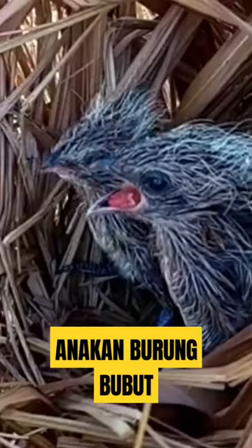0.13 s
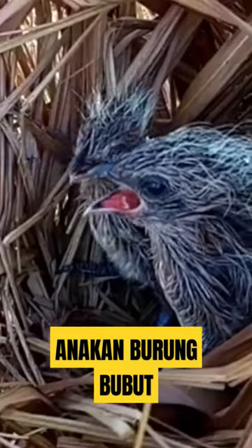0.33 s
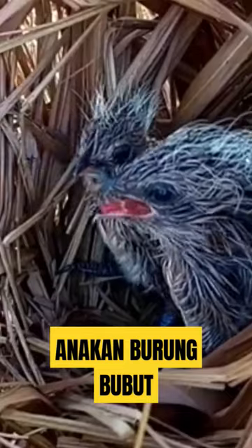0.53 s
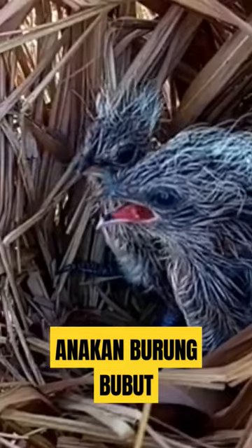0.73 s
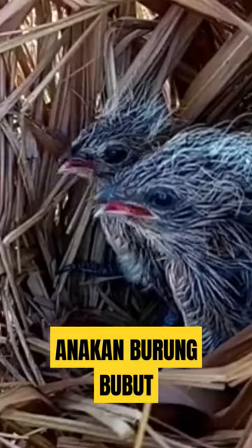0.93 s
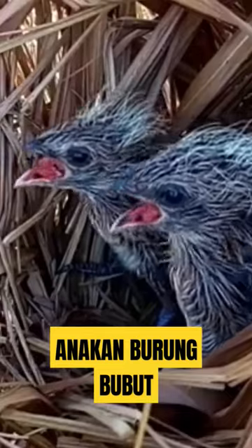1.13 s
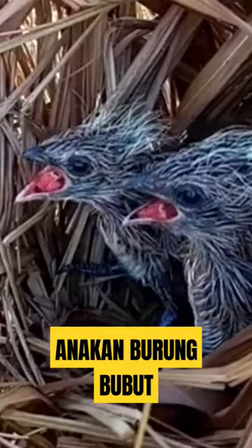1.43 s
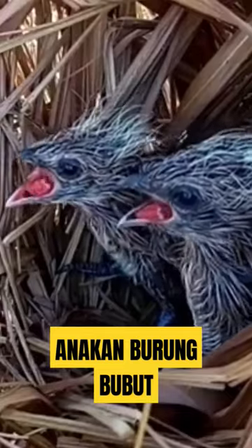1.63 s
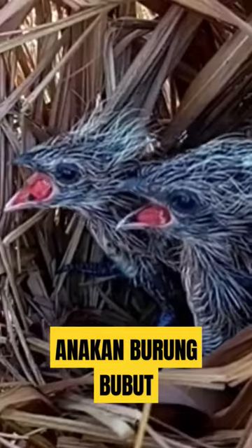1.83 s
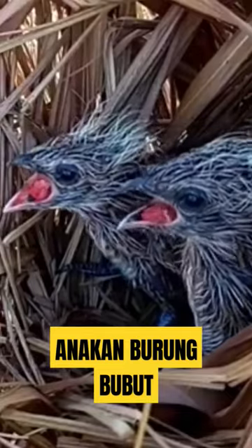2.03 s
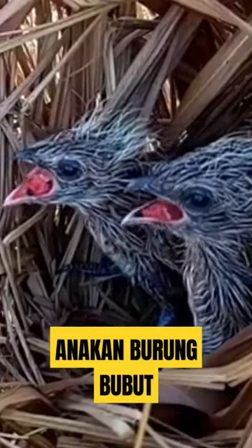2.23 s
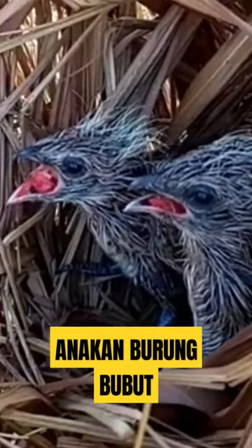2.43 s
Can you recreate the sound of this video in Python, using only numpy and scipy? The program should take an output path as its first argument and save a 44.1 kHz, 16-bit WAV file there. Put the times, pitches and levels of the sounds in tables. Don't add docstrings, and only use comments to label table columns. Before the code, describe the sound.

After a brief silence, harsh wheezy chick calls come irregularly, a sharp beak snap follows near one second, then steady rapid hissy squeaks continue over rumbling wind, soft outdoor hush and faint buzzing insects.

```python
import sys
import numpy as np
from scipy import signal
from scipy.fft import rfft, irfft
from scipy.io import wavfile
from scipy.ndimage import uniform_filter1d

SR = 44100
rng = np.random.default_rng(int(sys.argv[2]) if len(sys.argv) > 2 else 0)


def int16_out(signal):
    q = np.round(np.clip(np.atleast_2d(signal).T, -1, 1) * 32767)
    wavfile.write(sys.argv[1], SR, q.astype(np.int16))


def makeup_ratio(level_db):
    decades = np.asarray(level_db, float) / 20
    return 10 ** decades


N = 114219
T = np.arange(N) / SR
START_S = 0.1285
PORT_HZ, PORT_WIDTH_HZ, PORT_DB = 11195, 221, 20


def unit(x):
    return x / np.sqrt(np.mean(x ** 2))


def ring(x, hz, width_hz):
    return signal.lfilter(*signal.iirpeak(hz, hz / width_hz, SR), x)


def ring_twice(x, hz, width_hz):
    return ring(ring(x, hz, width_hz), hz, width_hz)


def walk(rate_hz):
    k = int(SR / rate_hz)
    steps = np.repeat(rng.standard_normal(N // k + 1), k)
    return 1.6 * uniform_filter1d(uniform_filter1d(steps, k), k)[:N]


def gate(start_s, length_s, attack_s, release_s):
    rise = (T - start_s) / attack_s
    fall = (start_s + length_s - T) / release_s
    return np.sin(np.pi / 2 * np.clip(np.minimum(rise, fall), 0, 1)) ** 2


def sweep(hz):
    return np.sin(2 * np.pi * np.cumsum(hz) / SR)


# (centre [Hz], width [Hz], level [dB])
THROAT_BANDS = [(2000, 500, -22), (3000, 260, -4), (4350, 800, 0), (5500, 800, 0), (6400, 900, -3),
                (7700, 900, -13), (9700, 700, -12), (11200, 1500, -13)]


def throat_gain(hz, beak_db):
    gain = makeup_ratio(-22.5)
    for centre_hz, width_hz, db in THROAT_BANDS:
        shape_db = np.interp(centre_hz, (2000, 3000, 4350, 5500, 7700), beak_db)
        gain = gain + makeup_ratio(db + shape_db) / (1 + (2 * (hz - centre_hz) / width_hz) ** 4)
    return gain


# (start [s], length [s], top pitch [Hz], overtone level [dB], fundamental level [dB])
SQUEAK_EVENTS = [(0.08, 0.083, 1051, -40.5, -41), (0.24, 0.088, 1076, -38, -39),
                 (0.458, 0.075, 895, -79, -40), (0.491, 0.19, 1157, -84, -47),
                 (0.625, 0.086, 1029, -41, -38), (0.709, 0.087, 990, -58.5, -51),
                 (0.808, 0.078, 945, -45.5, -44), (0.915, 0.12, 1012, -75, -49.5),
                 (1.205, 0.063, 924, -52, -48), (1.335, 0.098, 1037, -37.5, -45),
                 (1.499, 0.097, 1062, -33.5, -47.5), (1.661, 0.1, 1080, -35, -51.5),
                 (1.825, 0.088, 1120, -34.5, -55), (1.992, 0.071, 1120, -36, -42.5),
                 (2.146, 0.082, 1135, -37, -48.5), (2.319, 0.13, 1283, -55, -65),
                 (2.504, 0.052, 1264, -46, -60)]
SQUEAK_ROUGH = [.6, .55, .45, .9, .25, .7, .35, .8, .45, .4, .3, .28, .32, .62, .55, .9, .9]
PITCH_ARCHES = [
    (.08, .23),
    (.2, .27),
]
# (peak position [share], then gain near 2, 3, 4.4, 5.5, 7.7 kHz [dB])
BEAK_SHAPES = [(0.39, 13, -13, -5.5, -0.5, -17), (0.31, 3, -10, 1, 5, -3), (0.24, 0, 0, 0, 0, 2),
               (0.296, 0, 0, -3, 0, -2), (0.244, 2, 3.5, -8, 1, -6.5), (0.31, 6, -1, -5, 0, 8),
               (0.32, 9, 6, 2.5, 2, -10), (0.34, 0, 0, 4, 2, -4), (0.48, 24, -14, -1, 5, 6),
               (0.52, -6, 0.5, -5, -5, 3.5), (0.3, -20, -2, -1, -5, -10), (0.42, -18, -2.5, 0, 0, -3),
               (0.26, -14, -2.5, 0.5, 0, -0.5), (0.41, -2, -8, 2, -0.5, -8.5), (0.4, -10, -4, 5.5, 2, -5.5),
               (.38, 0, -5, -3, 6.5, 0), (0.35, 0, -5, -7, 3, -2)]


def squeaks():
    first_chick_until_s, arch_power = 1.1, 2.1
    out, shake = np.zeros(N), walk(500)
    flutter = [walk(420) for _ in range(14)]
    for event, rough, (crest, *beak_db) in zip(SQUEAK_EVENTS, SQUEAK_ROUGH, BEAK_SHAPES):
        start, length, top_hz, db, low_db = event
        s = slice(int(start * SR), int((start + length) * SR))
        u = (T[s] - start) / length
        rise, sag = PITCH_ARCHES[int(start > first_chick_until_s)]
        before = rise * np.abs(1 - u / crest) ** arch_power
        after = sag * np.abs((u - crest) / (1 - crest)) ** arch_power
        effort = 1 - np.where(u < crest, before, after)
        hz = top_hz * effort
        phase = 2 * np.pi * np.cumsum(hz * (1 + 0.014 * rough * shake[s])) / SR
        tone = makeup_ratio(low_db) * effort ** 3 * np.sin(phase + 1.16 * rough * flutter[1][s])
        for k in range(2, 14):
            gain = throat_gain(k * hz, beak_db) * effort ** (6 * abs(k - 3))
            gain = gain * makeup_ratio(6 * rough * flutter[k][s])
            tone += makeup_ratio(db) * gain * np.sin(k * phase + 1.3 * rough * flutter[k - 1][s])
        edge = gate(start, length, 0.2 * length, 0.2 * length)[s]
        out[s] += tone * edge * makeup_ratio(2 * rough * flutter[0][s])
    return out


def cavity(bands):
    out = np.zeros(N)
    for hz, width_hz, db in bands:
        out += makeup_ratio(db + 1.8 * walk(70)) * ring_twice(rng.standard_normal(N), hz, width_hz)
    return unit(out)


# (start [s], length [s], first puff [dB], steady hiss [dB], closing puff [dB])
PANT_EVENTS = [(0.108, 0.045, -76, -43, -81), (0.233, 0.097, -69, -44, -72), (0.593, 0.13, -60, -51.5, -55),
               (1.108, 0.061, -50, -47.5, -56), (1.16, 0.1, -74, -50, -70), (1.258, 0.07, -53, -48.5, -45),
               (1.325, 0.11, -43, -43, -53), (1.453, 0.15, -39.5, -40, -64), (1.632, 0.13, -39, -39.5, -67),
               (1.791, 0.13, -32.5, -40, -60), (1.954, 0.12, -35.5, -38.5, -69),
               (2.119, 0.13, -34, -38.5, -74), (2.285, 0.14, -35, -39.5, -32.5),
               (2.473, 0.12, -31, -42.5, -34.5)]
# (centre [Hz], width [Hz], level [dB])
PUFF_BANDS = [(5880, 1200, -4.5), (7300, 480, 7), (8500, 1300, -4), (10436, 1380, 0), (13700, 20200, -21)]
# (centre [Hz], width [Hz], level [dB])
HISS_BANDS = [(2870, 800, -2), (4600, 4300, -2.5), (5960, 2270, 1), (7970, 2340, 2), (10180, 3300, -5),
              (14800, 2100, -11.5)]


def pants():
    puff_s = close_s = 0.045
    puff, hiss = np.zeros(N), np.zeros(N)
    for start, length, open_db, hiss_db, close_db in PANT_EVENTS:
        puff += makeup_ratio(open_db) * gate(start, puff_s, 0.015, 0.0061)
        puff += makeup_ratio(close_db) * gate(start + length - close_s, close_s, 0.043, 0.0025)
        fade_db = -2 * np.clip((T - start) / length, 0, 1) ** 2
        hiss += makeup_ratio(hiss_db + fade_db) * gate(start, length, 0.0097, 0.013)
    puff = puff * makeup_ratio(0.83 * walk(120)) * cavity(PUFF_BANDS)
    return puff + hiss * makeup_ratio(1.87 * walk(90)) * cavity(HISS_BANDS)


# (time [s], peak level [dB], ring [Hz], crackle [share])
CLICK_EVENTS = [
    (.254, -36, 6900, .6),
    (0.581, -38.5, 10940, .3),
    (.618, -42, 7500, .8),
    (.637, -41, 8500, .8),
    (0.9568, -13.5, 7500, 0.18),
    (1.136, -39, 13100, .8),
    (1.148, -40, 7900, .6),
    (1.177, -42, 13600, .6),
    (1.2205, -28.5, 5700, 1),
    (2.574, -25, 7300, .3),
]


def clicks():
    t60_s, rise_s, tick_db = 0.0029, 0.00017, -4
    out = np.zeros(N)
    for start, db, hz, crackle in CLICK_EVENTS:
        u = np.clip(T - start, 0, None)
        fade = 4 * np.exp(-np.log(1000) * u / t60_s) * (1 - np.exp(-u / rise_s)) ** 2
        snap = np.sin(2 * np.pi * hz * u) + makeup_ratio(tick_db) * np.sin(2 * np.pi * PORT_HZ * u)
        out += makeup_ratio(db) * fade * (snap + crackle * rng.standard_normal(N))
    return out


# (start [s], length [s], top [Hz], arch [Hz], level [dB])
WHISTLE_EVENT = (.149, .038, 2300, 1500, -37)


def whistle():
    start, length, top_hz, arch_hz, db = WHISTLE_EVENT
    u = np.clip((T - start) / length, 0, 1)
    return makeup_ratio(db) * gate(start, length, length / 4, length / 3) * sweep(top_hz - arch_hz * (u - 0.4) ** 2)


# (start [s], length [s], pitch [Hz], level [dB])
CHIRP_EVENTS = [
    (0.494, 0.021, 7400, -47.5),
    (0.696, 0.031, 7450, -51),
    (0.874, 0.047, 7520, -48.5),
    (0.916, 0.028, 7500, -49),
    (1.073, 0.028, 7460, -49.5),
    (1.107, .028, 7370, -48.5),
    (2.177, 0.067, 2096, -46),
    (2.333, 0.037, 3830, -53),
    (2.518, 0.048, 3800, -54),
    (2.445, 0.025, 6400, -60),
]


def chirps():
    out = np.zeros(N)
    for start, length, hz, db in CHIRP_EVENTS:
        u = np.clip((T - start) / length, 0, 1)
        out += makeup_ratio(db) * gate(start, length, length / 3, length / 3) * sweep(hz - 700 * (u - 0.35) ** 2)
    return out * makeup_ratio(2.5 * walk(120))


# (pitch [Hz], rate [1/s], time at which one chirp begins [s], duty [share], level [dB], pause from
# [s], pause to [s])
CRICKET_SONGS = [
    (6440, 16, .13, .94, -55, .6, .66),
    (8330, 18.2, .684, .78, -55.5, .335, .68),
]


def crickets():
    out = np.zeros(N)
    for hz, rate, first, duty, db, pause, resume in CRICKET_SONGS:
        cycle = ((T - first) * rate + 0.04 * walk(6)) % 1
        on = uniform_filter1d(1.0 * (cycle < duty), size=150)
        on = on * (1 - gate(pause, resume - pause, 0.0072, 0.01))
        out += makeup_ratio(db + 3 * walk(98)) * on * np.sin(2 * np.pi * hz * T + 1.5 * walk(130))
    return out


# (start [s], length [s], pitch [Hz], level [dB])
BUZZ_EVENTS = [
    (0.487, 0.094, 5100, -53),
    (.64, 0.08, 5180, -49.5),
    (.73, 0.21, 4830, -56),
    (0.958, 0.074, 5250, -50.5),
    (1.256, 0.57, 5280, -50.5),
    (2.443, 0.035, 5430, -51),
]


def buzzes():
    stroke_hz, sweep_hz, width_hz = 232, 900, 500
    beat = (stroke_hz * T + 0.3 * walk(40)) % 1
    stroke = np.sin(np.pi * beat) ** 2 * makeup_ratio(2 * walk(150))
    rasp = rng.standard_normal(N)
    out = np.zeros(N)
    for start, length, hz, db in BUZZ_EVENTS:
        tone = 1.6 * stroke * sweep(hz + sweep_hz * (0.5 - beat))
        band = 0.6 * unit(ring_twice(rasp, hz, width_hz))
        out += makeup_ratio(db) * gate(start, length, 0.015, 0.015) * (tone + band)
    return out


# (start [s], length [s], pitch [Hz], level [dB])
COO_EVENTS = [
    (0.18, 0.17, 2030, -54.5),
    (1.34, .11, 2000, -54),
    (1.547, 0.078, 1980, -53.5),
    (1.681, 0.11, 2010, -56.5),
    (2.19, 0.246, 2070, -61),
    (2.283, 0.29, 1305, -61),
]
# (time [s], peak level [dB], pitch [Hz])
KNOCK_EVENTS = [
    (0.128, -76, 653),
    (0.591, -37, 423),
    (1.969, -42.5, 443),
    (2.012, -38.5, 450),
    (2.166, -36.5, 420),
    (2.289, -48, 580),
]


def murmurs():
    noise = rng.standard_normal(N)
    out = np.zeros(N)
    for start, length, hz, db in COO_EVENTS:
        out += makeup_ratio(db) * gate(start, length, 0.0033, 0.018) * unit(ring_twice(noise, hz, 230))
    for time, db, hz in KNOCK_EVENTS:
        out += makeup_ratio(db) * gate(time - 0.005, 0.036, 0.0019, 0.042) * unit(ring_twice(noise, hz, 106))
    return out


# (time [s], level [dB])
GUST_LEVELS = [(.13, -25), (.28, -21), (.58, -19.5), (.64, -25.5), (.72, -18.5), (.98, -26.5), (1.2, -22),
               (1.328, -30.5), (1.442, -22), (1.54, -30), (1.64, -20.5), (1.76, -23), (1.92, -28.5),
               (1.97, -22), (2.22, -29), (2.33, -20.5), (2.48, -32), (2.59, -32)]
# (frequency [Hz], density [dB/Hz])
WIND_SPECTRUM = [(13, -42), (22, -54), (54, 0.5), (108, -1), (132, -3), (167, -15.5), (258, -19.5),
                 (410, -34.5), (700, -56.5), (910, -70), (1540, -120)]


def shaped(spectrum):
    hz, db = np.array(spectrum).T
    f = np.arange(N // 2 + 1) * SR / N + 1
    gain = makeup_ratio(np.interp(np.log(f), np.log(hz), db))
    return unit(irfft(rfft(rng.standard_normal(N)) * gain, N))


def wind():
    rumble = shaped([(5, -75)] + list(WIND_SPECTRUM) + [(1100, -124)])
    power = uniform_filter1d(uniform_filter1d(rumble ** 2, size=4000), size=4000)
    rumble = unit(rumble / power ** 0.21)
    time, db = np.array(GUST_LEVELS).T
    onset = np.clip((T - START_S) / 0.003, 0.3, 1)
    return makeup_ratio(np.interp(T, time, db) + walk(14)) * rumble * onset


# (frequency [Hz], level [dB])
AIR_SPECTRUM = [(700, -6), (2000, -8.5), (3300, -9.5), (5000, -6.5), (7000, -10.5), (9300, -10.5),
                (11200, -14.5), (15000, -18.5)]
# (time [s], level [dB])
STIR_LEVELS = [
    (.13, 1.5),
    (.4, -2),
    (.6, 1),
    (1.05, -0.5),
    (1.2, 1),
    (1.9, 1),
    (2.59, 0),
]


def air():
    hz, db = np.array(AIR_SPECTRUM).T
    hush = np.zeros(N)
    for f in 400 * 1.26 ** np.arange(17):
        band_db = np.interp(np.log(f), np.log(hz), db) + 1.7 * (walk(8.44) + walk(34.74))
        hush += makeup_ratio(band_db) * ring_twice(rng.standard_normal(N), f, f / 3)
    return makeup_ratio(-50.5 + np.interp(T, *np.array(STIR_LEVELS).T)) * unit(hush)


def reeds(x):
    t60_s, tail_db = 0.09, -15
    u = T[:SR // 5]
    tail = rng.standard_normal(len(u)) * np.exp(-np.log(1000) * u / t60_s)
    tail = tail / np.sqrt(np.sum(tail ** 2))
    return x + makeup_ratio(tail_db) * signal.fftconvolve(x, tail)[:N]


def scene():
    chicks = reeds(squeaks() + pants() + 0.5 * clicks())
    far = whistle() + chirps() + crickets() + buzzes() + murmurs()
    return (chicks + far + air() + wind())[None]


def low_pass(x):
    return signal.sosfilt(signal.butter(12, 16510, fs=SR, output="sos"), x)


# (centre [Hz], width [Hz], cancelled [share])
GROUND_DIPS = [
    (2600, 450, .6),
    (3600, 350, .55),
    (9500, 900, .5),
]


def record(dry):
    x = dry + makeup_ratio(PORT_DB) * ring(dry, PORT_HZ, PORT_WIDTH_HZ)
    for hz, width_hz, share in GROUND_DIPS:
        x = x - np.clip(share, 0, 1) * ring(x, hz, width_hz)
    x = signal.sosfilt(signal.ellip(8, 0.3, 50, 15450, fs=SR, output="sos"), x)
    x = x * np.clip((T - START_S) / 0.0002, 0, 1)
    return low_pass(x)


dry = scene()
out = record(dry)
int16_out(out)
```